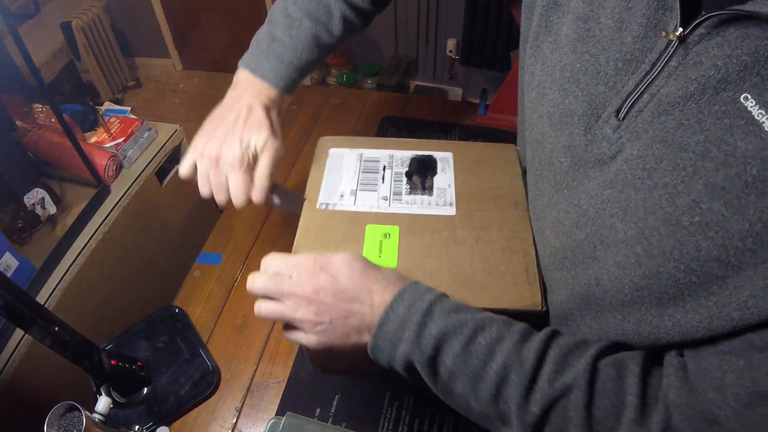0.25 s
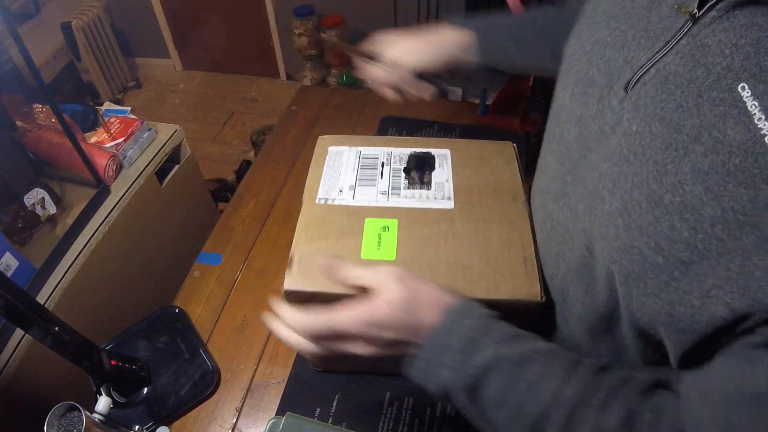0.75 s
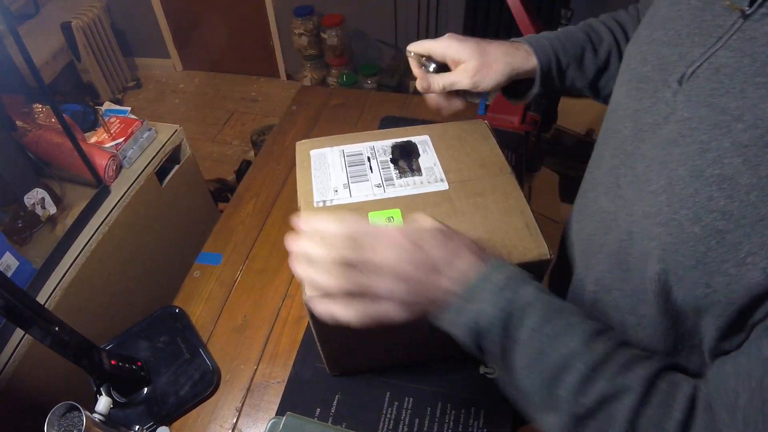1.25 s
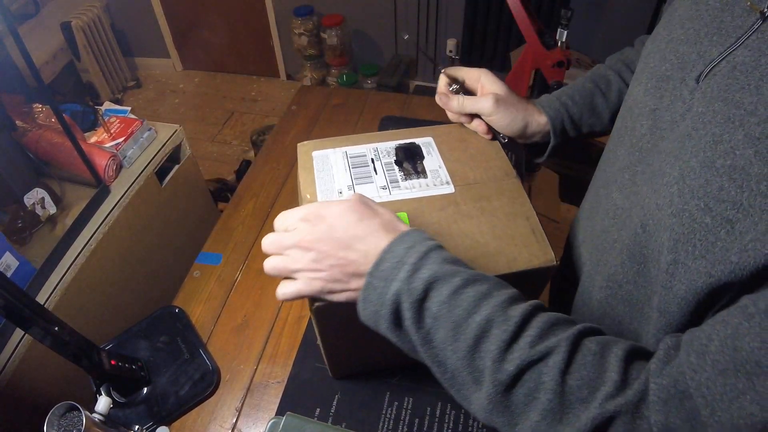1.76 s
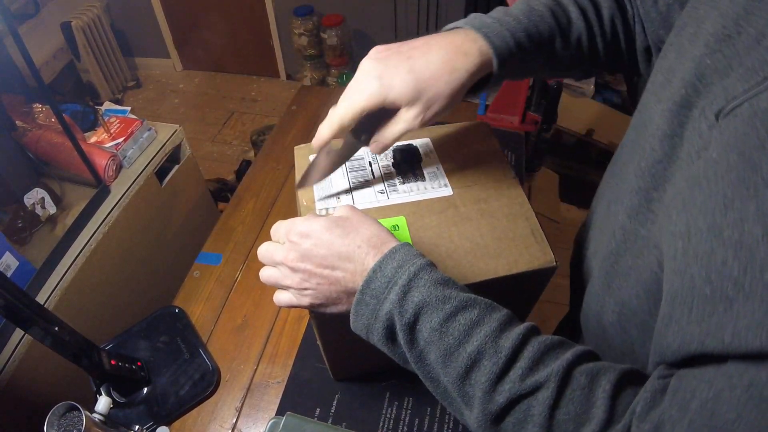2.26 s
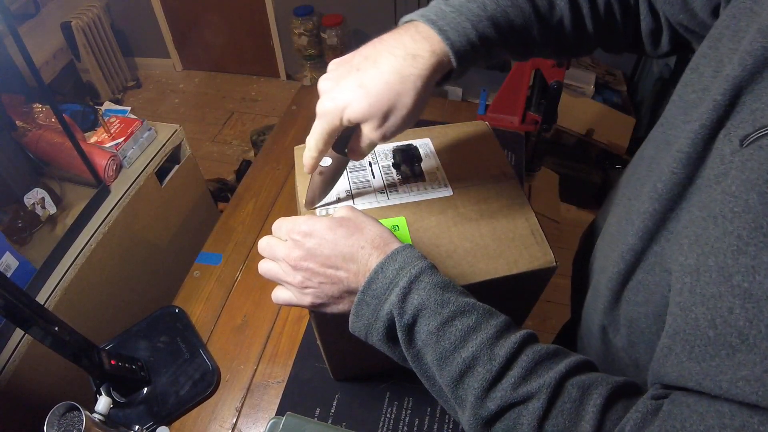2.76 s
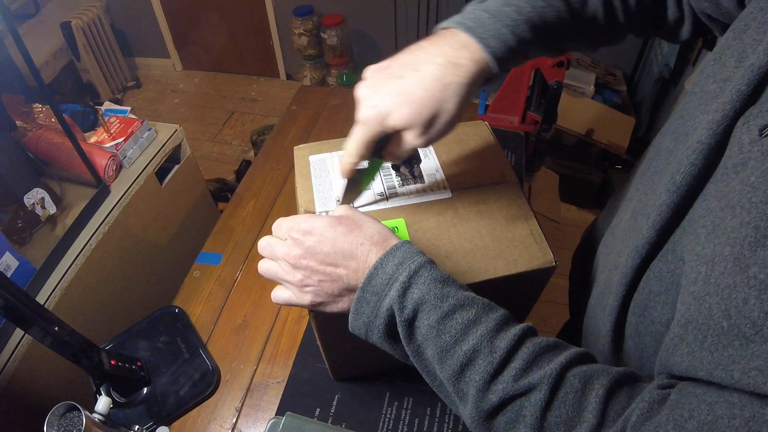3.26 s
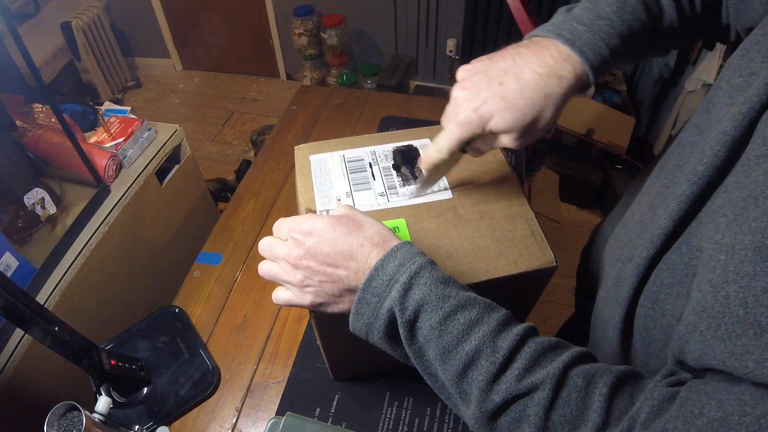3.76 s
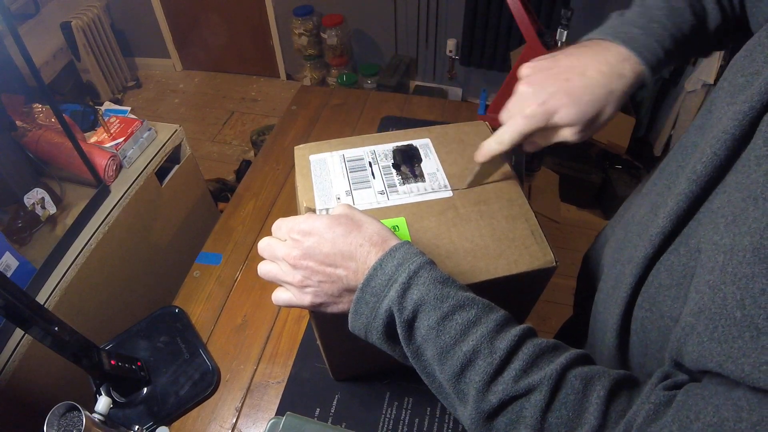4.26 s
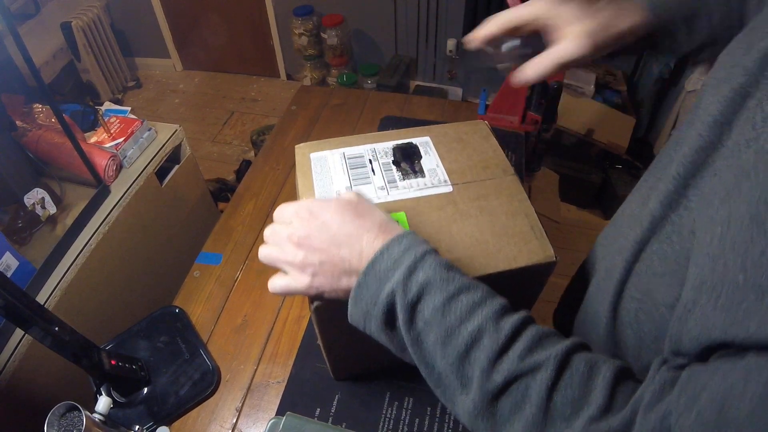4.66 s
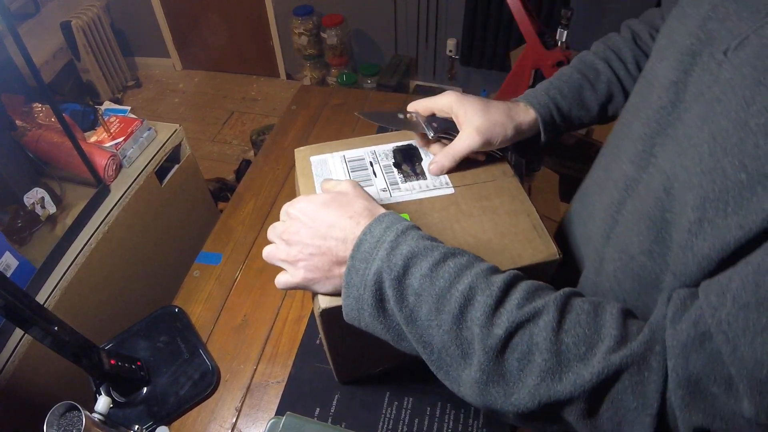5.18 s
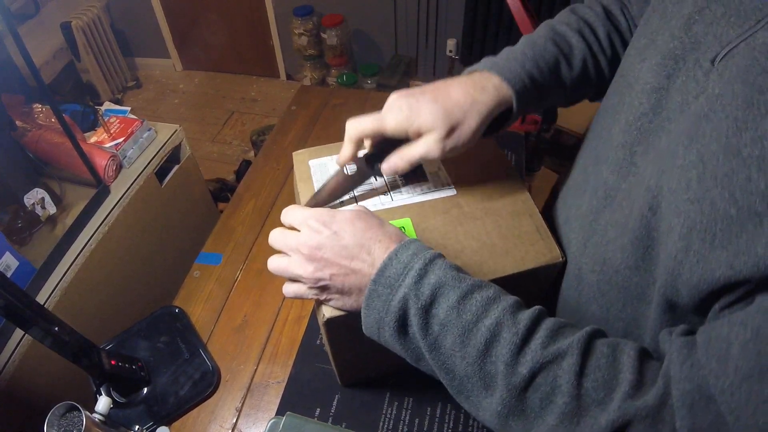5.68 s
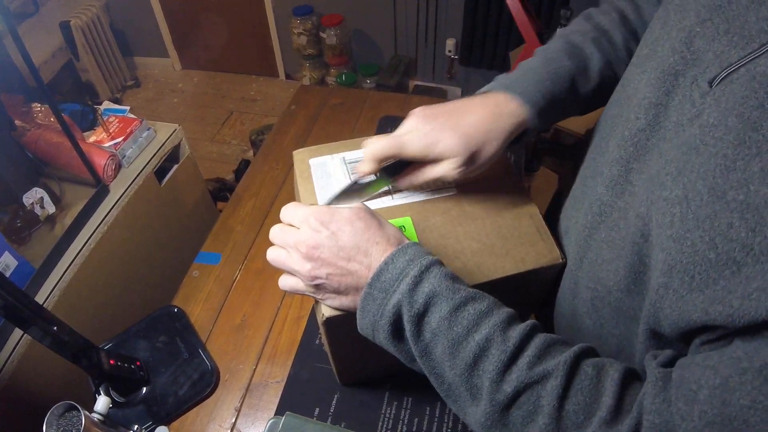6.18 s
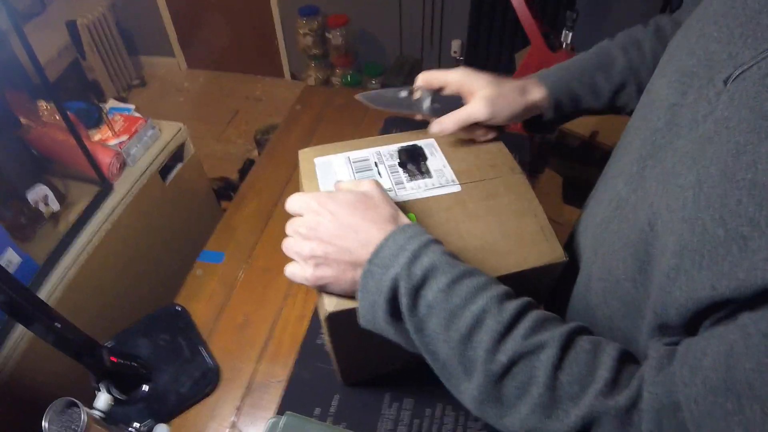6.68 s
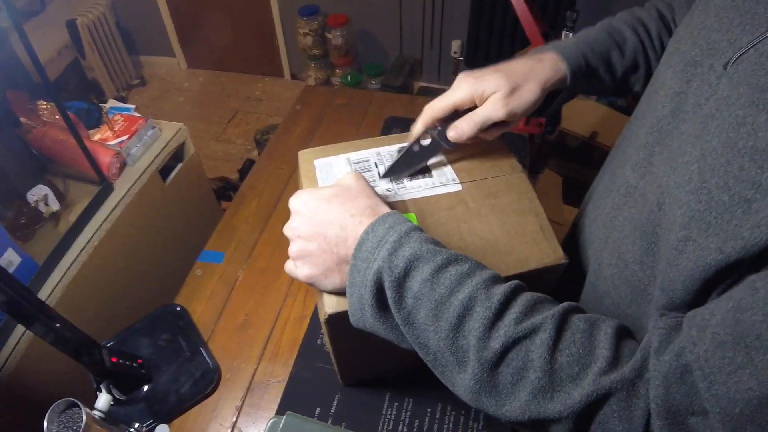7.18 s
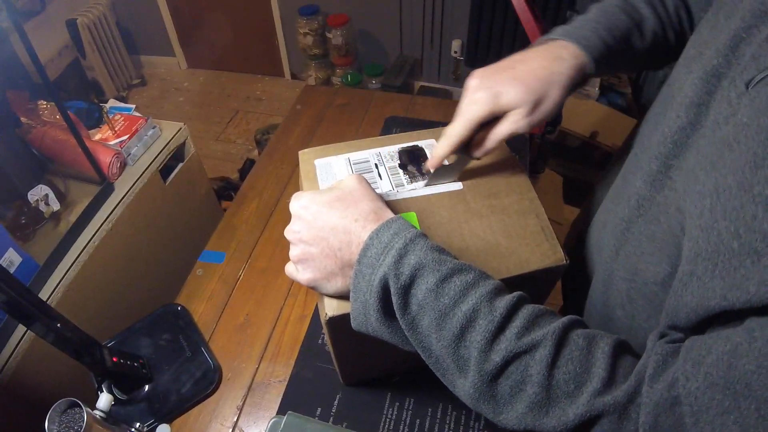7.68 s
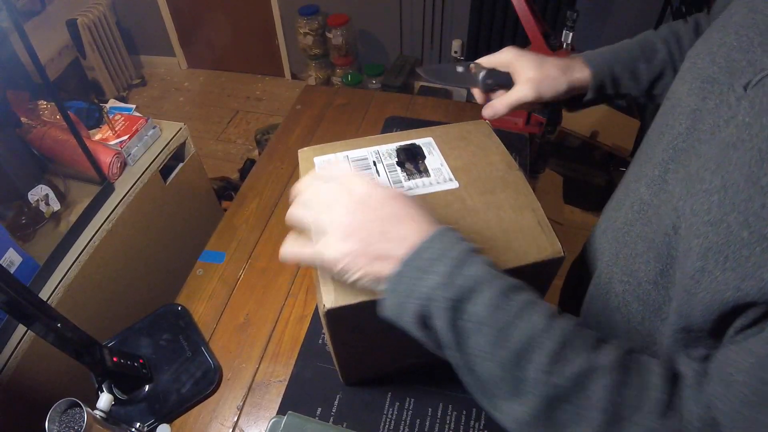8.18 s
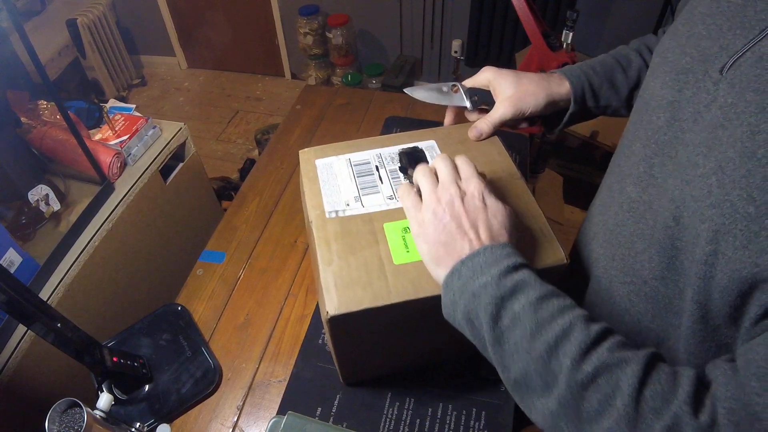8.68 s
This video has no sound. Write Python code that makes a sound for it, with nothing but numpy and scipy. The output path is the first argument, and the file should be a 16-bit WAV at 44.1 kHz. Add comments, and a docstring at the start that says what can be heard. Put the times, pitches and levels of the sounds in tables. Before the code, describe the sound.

Close up in a small workshop, a blade rasps through packing tape in two quick tugs, the hollow box droning underneath. Hands pat and shift the carton with dull bench knocks. A slower cut crackles and ends in a loud pop; the knife clicks in the hand, another cut follows, then hard bright knocks and one last ripping slice before soft rustling. Low rumble and thin hiss behind.

```python
"""A blade rasps and snaps through packing tape, close by in a small room, and the hollow cardboard box drones under it.
Friction is made of random slips and noise, breaks are short bursts, and resonances give them tape, board and steel.
A folding knife clicks in the hand, sleeves rustle, a palm pats the lid and a fingertip squeaks.
The box rocks on a wooden workbench: its knocks are smooth pushes that arrive dry, through the wood.
Behind it all lie a low rumble and a thin hiss; once the level sinks abruptly, then creeps back."""
import sys
import numpy as np
from scipy import signal
from scipy.fft import rfft, irfft
from scipy.io import wavfile
from scipy.ndimage import uniform_filter1d

SR = 44100
rng = np.random.default_rng(int(sys.argv[2]) if len(sys.argv) > 2 else 0)


def inscribe(sig):
    """Save sig as 16-bit PCM at rate SR to the path in sys.argv[1].

    A 1-D sig is mono; a 2-D sig holds one channel per row.
    Samples are clipped to [-1, 1] before scaling.
    """
    pcm = np.round(np.clip(np.atleast_2d(sig).T, -1, 1) * 32767)
    wavfile.write(sys.argv[1], SR, pcm.astype(np.int16))


N = 393813
TIME = np.arange(N) / SR

# colour of rasping and cracking tape: pitch_hz, level_db
TAPE_COLOUR = [(350, -6.5), (600, -6), (761, -15.5), (903, -4), (1210, -13.5), (1650, -7), (2100, -12.5),
               (2800, -8), (3900, -13), (5150, -2.5), (5900, -8), (6610, -6.5), (9430, -13.5), (10500, -28),
               (12400, -39.5), (14000, -57.5)]
# resonances of the hollow box: pitch_hz, width_hz, level_db
BOX_RESONANCES = [(190, 45, 3), (243, 30, -1), (330, 30, 3), (390, 85, 6), (498, 84, 5), (576, 57, -1),
                  (1126, 140, -1), (1390, 330, 1), (1730, 88, -8.5)]
PANEL_WIDTH_HZ = 65  # resonance of the panel under the blade


def blade():
    """The edge glides or sticks and slips: film rasps, steel sings, fibres crunch, and coarser tugs drive the box."""
    # pulls of the blade, levels before the trims below:
    # raggedness (0 to 1), ring_db, crunch_db, curve of (time_s, rasp_db, drone_db)
    strokes = [ (0.66, -17, -8, [(0.0, -38, -64), (0.035, -46.5, -58), (0.07, -47.5, -43.5),
               (0.122, -44, -51), (0.146, -27.5, -64), (0.158, -43, -51.5), (0.225, -37, -37.5),
               (0.265, -49.5, -48), (0.3, -52, -58)]), (0.81, -9, -4.5, [(0.3, -50, -53.5),
               (0.37, -40, -42), (0.405, -40, -40), (0.434, -26.5, -44), (0.448, -43, -36),
               (0.47, -36, -51), (0.5, -34, -58), (0.53, -55, -71), (0.55, -56, -66)]),
               (0.77, -15, -8, [(3.23, -63, -38), (3.266, -75, -62), (3.29, -59, -54), (3.398, -54.5, -41),
               (3.432, -63, -45.5), (3.63, -59, -43.5), (3.742, -54, -45.5), (3.81, -65, -49.5),
               (3.842, -36, -26.5)]), (.9, -11, -5, [(3.85, -40, -15.5), (3.856, -43.5, -28),
               (3.876, -36, -34), (3.906, -69, -40.5), (3.955, -74, -67)]), (.4, -5, -4.5, [(4.0, -58, -61),
               (4.04, -53.5, -53), (4.1, -56, -61), (4.16, -60.5, -57), (4.215, -58, -54),
               (4.236, -58, -35), (4.255, -56, -61)]), (.1, -30, -10.5, [(4.262, -51, -53),
               (4.285, -43.5, -33), (4.318, -55, -46), (4.38, -45.5, -49), (4.465, -46, -54),
               (4.5, -45, -40), (4.525, -53, -35), (4.56, -68, -67)]), (0.36, -3.5, -17, [(5.72, -71, -67),
               (5.765, -46, -42), (5.806, -58, -52), (5.86, -77, -76)]), (.5, 2, -10, [(5.872, -73, -60),
               (5.886, -42.5, -38), (5.905, -52, -46), (5.935, -61, -48), (5.99, -65.5, -58)]),
               (0.48, -11, -11, [(5.992, -60, -47.5), (6.004, -43.5, -54.5), (6.055, -49.5, -51),
               (6.1, -62, -60)]), (0.54, -5, -9.5, [(6.11, -66, -49), (6.136, -46.5, -52),
               (6.19, -47.5, -34.5), (6.22, -55, -53), (6.265, -42, -38.5), (6.308, -38.5, -45),
               (6.334, -55, -53), (6.348, -43.5, -52), (6.362, -49.5, -42)]),
               (0.91, -4, -5, [(7.42, -78, -58), (7.447, -66, -61), (7.475, -59, -57), (7.495, -49, -64),
               (7.533, -65, -68)]), (.8, -3, -2.5, [(7.535, -61, -63), (7.565, -56, -42), (7.604, -39, -42),
               (7.63, -44, -47), (7.642, -35, -55), (7.662, -58, -46), (7.7, -65, -55), (7.76, -66, -51)]),
               ]
    # singing of the scraped steel: pitch_hz, width_hz, level_db
    steel_modes = [(1625, 67, 5.5), (1770, 72, 5), (2120, 150, -9), (2980, 170, -3.5), (4930, 260, -1.5)]
    rasp_trim_db, drone_trim_db, panel_db = -4, -2.5, -1

    slips = friction(per_s=1800, spread_db=2.7, smooth=.5, clump_db=2.7, clump_per_s=260)
    tugs = friction(per_s=200, spread_db=2.2, smooth=.35, clump_db=2.4, clump_per_s=70)
    glide = rng.standard_normal(N)
    film, steel, paper, load = np.zeros((4, N))
    for ragged, ring_db, crunch_db, curve in strokes:
        tape = gain_curve(curve, column=1)
        push = gain_curve(curve, column=2)
        scrape = tape * (np.sqrt(ragged) * slips + np.sqrt(1 - ragged) * glide)
        film += scrape
        steel += from_db(ring_db) * scrape
        paper += from_db(crunch_db) * np.sqrt(tape * push)
        load += push

    # steady gliding sets the reference level of each filter
    rasp = shifting(colour(film, TAPE_COLOUR)) / np.std(colour(glide, TAPE_COLOUR))
    ring = resonate(steel, steel_modes) / np.std(resonate(glide, steel_modes))
    drone = rms_one(rms_one(box(tugs)) + from_db(panel_db) * panel(tugs))
    crunch = paper * fibres()
    hollow = from_db(drone_trim_db) * load * drone
    return from_db(rasp_trim_db) * (rasp + ring) + flutes() * (crunch + hollow)


def shifting(x):
    """The colour of the rasp shifts: each half octave swells and fades by itself."""
    shift_db, shifts_per_s = 2.6, 28
    out, below = 0, 0
    for hz in np.geomspace(700, 8000, 8):
        low = signal.sosfiltfilt(signal.butter(3, hz, fs=SR, output="sos"), x)
        band = low - below
        out = out + band * from_db(shift_db * wander(shifts_per_s))
        below = low
    return out + x - below


def fibres():
    """Paper fibres under the tape break in a dense crunch, each with a short ring at one of 14 pitches."""
    out = 0
    for hz in np.geomspace(980, 3800, 14):
        sizes = from_db(3.2 * np.minimum(rng.exponential(1, N), 3))
        breaks = (rng.random(N) < 60 / SR) * sizes
        out = out + resonate(breaks, [(hz, hz / 13, -3.5 * np.log2(hz / 900))])
    return rms_one(signal.sosfilt(signal.butter(2, 5000, fs=SR, output="sos"), out))


def flutes():
    """Gain that swings gently as the edge bumps over the flutes of the corrugated board."""
    flutes_per_s, jitter_cycles, swing_db = 23, 0.35, -0.5
    cycles = flutes_per_s * TIME + jitter_cycles * wander(19)
    return from_db(swing_db * np.cos(2 * np.pi * cycles))


def panel(x):
    """One resonance of the panel under the blade, gliding with the place of the cut."""
    size, r = 256, np.exp(-np.pi * PANEL_WIDTH_HZ / SR)
    out, state = np.zeros(N), np.zeros(2)
    for i, hz in zip(range(0, N, size), panel_hz(TIME[::size])):
        poles = [1, -2 * r * np.cos(2 * np.pi * hz / SR), r * r]
        out[i:i + size], state = signal.lfilter([1, 0, -1], poles, x[i:i + size], zi=state)
    return rms_one(board(out))


def panel_hz(s):
    """Pitch of the panel at time s; it rings higher as the cut nears a stiff edge."""
    # glide of the panel: time_s, pitch_hz
    glide_points = [(0, 302), (.3, 360), (.43, 590), (.55, 450), (3.3, 350), (3.5, 390), (3.63, 550),
                    (3.73, 577), (3.85, 534), (4.3, 530), (4.55, 564), (5.75, 304), (6.1, 322), (6.3, 534),
                    (6.4, 510), (7.48, 606), (7.63, 623), (7.75, 487), (8.0, 563)]
    return np.interp(s, *np.transpose(glide_points))


def box(x):
    """The hollow box: panel modes in soft board."""
    return board(resonate(x, BOX_RESONANCES))


def board(x):
    """Soft board lets little through above its main resonances."""
    edge_hz, leak_db = 650, -19
    return signal.sosfilt(signal.butter(6, edge_hz, fs=SR, output="sos"), x) + from_db(leak_db) * x


def tape_snaps():
    """Stretched tape cracks and the released panel thumps: (towards the microphone, into the room)."""
    # snaps under the blade: time_s, crack_db, thump_db
    snap_times = [(0.1434, -34, -47), (0.203, -38, -27.5), (0.219, -25, -40), (0.413, -43, -46),
                  (0.434, -28, -20), (0.456, -25, -44), (1.67, -29, -32), (2.973, -21, -27.5),
                  (3.2009, -25.5, -29), (3.299, -38.5, -31), (3.382, -35, -51), (3.488, -39.5, -27.5),
                  (3.618, -33, -30), (3.629, -46, -26), (3.7234, -38.5, -21.5), (3.8440, -23, -8),
                  (3.865, -34, -16), (3.875, -38, -16), (4.269, -35.5, -25), (5.887, -45, -52),
                  (6.309, -31, -17), (6.343, -42, -28), (6.3717, -26, -10.5), (6.379, -28.5, -29),
                  (7.480, -27, -32), (7.6256, -27, -18.5), (7.641, -19, -40), (7.988, -34.5, -26.5),
                  (8.0496, -31, -36)]
    crack_room_db, thump_room_db, thump_panel_db = 3, -4, 5
    cracks, spread, thumps = np.zeros((3, N))
    for s, crack_db, thump_db in snap_times:
        crack = burst(lambda x: colour(x, TAPE_COLOUR), decay_s=.005, flurry=3.0)
        add(cracks, s, from_db(crack_db) * crack)
        add(spread, s, from_db(crack_db + crack_room_db) * clean_crack(TAPE_COLOUR))
        struck = BOX_RESONANCES + [(panel_hz(s), PANEL_WIDTH_HZ, thump_panel_db)]
        thump = burst(lambda x: board(resonate(x, struck)), decay_s=0.0066, flurry=0.98)
        add(thumps, s, from_db(thump_db) * thump)
    dull = [(100, -1.0), (5500, -5.0), (9000, -10.5), (13000, -17)]  # Hz, dB
    return colour(cracks + thumps, dull), colour(spread + from_db(thump_room_db) * thumps, dull)


def paper_tears():
    """A bundle of fibres parts in a quick run of dry ticks around one pitch, and jolts the box."""
    # tears under the tape: time_s, level_db (of the first tick), pitch_hz
    tear_times = [(0.008, -42.5, 2270), (0.131, -38, 3300), (0.167, -33, 2200), (0.18, -44.5, 3040),
                  (0.221, -48, 2700), (0.237, -50, 2000), (0.413, -32, 3300), (0.431, -30.5, 2400),
                  (0.434, -30, 840), (0.436, -30, 3920), (0.457, -37, 2350), (0.483, -42, 2240),
                  (0.494, -32, 2070), (3.347, -46, 2660), (3.381, -41.5, 3220), (3.419, -43.5, 1500),
                  (3.455, -40, 1400), (3.5, -44.5, 1600), (3.538, -41, 1210), (3.585, -46, 1210),
                  (3.627, -39, 810), (3.76, -45.5, 1300), (4.497, -41, 4700), (6.269, -37, 1600),
                  (6.286, -33.5, 1200), (6.304, -36.5, 2380), (7.424, -44.5, 730), (7.443, -43.5, 2260),
                  (7.458, -51, 2000), (7.603, -30.5, 2000), (7.624, -22, 810), (7.64, -25.5, 1500),
                  (7.695, -45, 1430)]
    run_s, fade_db, spread_octaves, jolt_db = .013, -7, .22, -7
    out = np.zeros(N)
    for s, level_db, centre_hz in tear_times:
        for late in rng.random(size=4) * [0, 1, 1, 1]:
            hz = centre_hz * 2 ** (spread_octaves * rng.standard_normal())
            fibre = [(hz, hz / 6, -7)]
            snap = burst(lambda x: resonate(x, fibre) + from_db(jolt_db) * box(x), decay_s=0.0014, flurry=0.84)
            add(out, s + late * run_s, from_db(level_db + fade_db * late) * snap)
    return out


def knocks():
    """Each contact is one smooth push into bench and microphone stand; the shorter it is, the brighter."""
    # resonances of the bench: pitch_hz, width_hz, level_db
    bench_modes = [(70, 50, -5), (132, 55, -2), (245, 50, -5.5), (320, 50, -4), (540, 190, -4.5),
                   (860, 300, -2), (1400, 600, -5)]
    # ring of the microphone stand: pitch_hz, width_hz, level_db
    stand_modes = [(6620, 230, 3.5), (8720, 170, 8)]
    lead_s, rebound_s, rebound_db = 1 / 200, .035, -25
    out = np.zeros(N)
    t = TIME[:SR // 8] - lead_s
    for s, level_db, contact_ms in contacts():
        half_width = contact_ms / 1000 / 2
        push = 1 / np.cosh(np.minimum(1.333 * t / half_width, 40))
        # the crushed edge meets the wood unevenly and touches again at once
        again_s, again_db = rng.uniform(.0007, .003), rng.uniform(-17, -8)
        push += from_db(again_db) / np.cosh(np.clip((t - again_s) / half_width, -40, 40))
        # the box settles in a few weaker, softer rebounds
        for late in rng.random(size=3):
            lag = np.clip((t - .004 - late * rebound_s) / half_width, -80, 80)
            push += from_db(rebound_db - 22 * late) / np.cosh(0.45 * lag)
        # each spot on the bench answers with its own mix of modes
        spot = varied(bench_modes, detune=.11, spread_db=3)
        stand = from_db(8.0) * resonate(push, stand_modes)
        knock = from_db(-11.0) * push + resonate(push, spot) + stand
        add(out, s - lead_s, from_db(level_db) * knock)
    return signal.sosfilt(signal.butter(2, 55, "high", fs=SR, output="sos"), out)


def contacts():
    """Every knock; the hardest landings slap a second corner down just after."""
    # box on bench: time_s, level_db (of the push, before its resonances), contact_ms (width at half height)
    knock_times = [(0.5667, -18, 0.93), (0.7657, -32.5, 1.9), (1.0421, -15, 0.74), (1.1839, -28, 0.39),
                   (1.1956, -10, 0.5), (1.2024, -24.5, 0.18), (1.2223, -24.5, 0.38), (1.274, -23, 1.07),
                   (3.395, -23, 1.3), (3.456, -24.5, 1.3), (3.971, -20, 0.8), (4.066, -27, 2.1),
                   (4.537, -20, 2.4), (4.5897, -16.5, 0.89), (4.681, -16.5, 0.77), (4.7311, -17.5, 0.84),
                   (4.905, -19, 1.13), (5.3653, -24.5, 1.4), (5.441, -33, 2.3), (5.5351, -26, 1.02),
                   (5.606, -22, 1.36), (5.7164, -18.5, 1.6), (5.805, -22.5, 1.23), (5.9867, -16, 0.69),
                   (6.0788, -19, 0.96), (6.3107, -36, 0.58), (6.356, -21, 0.56), (6.3726, -19, 0.48),
                   (6.41, -24, 0.81), (6.4993, -20.5, 0.25), (6.5127, -14.5, 0.23), (6.5151, -10.5, 0.86),
                   (6.578, -29.5, 0.38), (6.5935, 2, 0.13), (6.599, -13, 0.11), (6.606, -27.5, 0.23),
                   (6.622, -24, 0.53), (6.633, -30, 0.42), (6.674, -30.5, 0.4), (6.7212, -1, 0.14),
                   (6.763, -30, 0.47), (6.7711, -25.5, 0.19), (6.8142, -10, 0.19), (6.829, -34, 0.37),
                   (6.8392, -33, 0.5), (6.9232, -19, 0.33), (6.9398, -30.5, 0.37), (6.952, -30.5, 0.9),
                   (7.013, -13.5, 0.25), (7.0344, -22, 0.31), (7.05, -35, 1.3), (7.117, -25.5, 0.49),
                   (7.143, -29, 0.97), (7.164, -37.5, 0.81), (7.209, -15.5, 0.32), (7.243, -39, 0.69),
                   (7.286, -9, 0.23), (7.298, -26.5, 0.2), (7.302, -24, 0.35), (7.311, -25, 0.76),
                   (7.7741, -15.5, 0.4), (8.637, -38.5, 0.49), (8.7177, -31, 0.56), (8.808, -34, 0.68)]
    slap_above_db, slap_lag_s, slap_db = -6, 0.00207, -19
    for s, level_db, contact_ms in knock_times:
        yield s, level_db, contact_ms
        if level_db > slap_above_db:
            yield s + slap_lag_s, level_db + slap_db, contact_ms


def bench_rattle(knock):
    """Things lying on the bench shiver dully for a moment after each knock; they have only so much play."""
    rattle_db, limit_db = -5.5, -37.5
    t = TIME[:SR // 5]
    shiver = rng.standard_normal(len(t)) * np.exp(-t / 0.015) * (t > .005)
    dull = [(60, -10), (200, 0), (380, 2), (600, -5), (1100, -10), (2000, -22), (3500, -34)]  # Hz, dB
    shiver = colour(shiver / np.sqrt(np.sum(shiver ** 2)), dull)
    play = from_db(limit_db)
    return from_db(rattle_db) * signal.fftconvolve(play * np.tanh(knock / play), shiver)[:N]


def knife_clicks():
    """Steel parts meet and the hand damps their ring at once: (towards the microphone, into the room)."""
    # clicks: time_s, level_db
    click_times = [(4.554, -46), (4.851, -48), (4.928, -49), (4.958, -47), (4.984, -34), (5.0817, -20),
                   (5.094, -34.5), (5.2319, -41), (5.2354, -20), (5.2368, -19), (5.251, -25.5),
                   (5.698, -28.5), (6.835, -51), (7, -49.5), (7.18, -55), (8.085, -45), (8.328, -50)]
    # resonances of the knife: pitch_hz, width_hz, level_db
    knife_modes = [(366, 24, 0), (468, 45, 4), (910, 190, -1.5), (1780, 480, 5.5), (2250, 640, -11),
                   (2800, 330, -3.5), (4890, 990, 4), (6670, 420, -9), (7960, 900, -15),
                   (11200, 4000, -16.5)]
    # a click as it spreads to all sides of the room: pitch_hz, level_db
    spread_colour = [(120, -29), (350, 4), (1000, 2.5), (1900, 0), (3900, -4.5), (5200, 2.5), (6700, 3),
                     (9400, -11.5), (10500, -25), (14000, -41)]
    # the microphone dulls the very top of the clicks: pitch_hz, level_db
    microphone_colour = [(100, 13.5), (9000, -1), (10500, -10), (14000, -17)]
    room_db = 2.5
    direct, spread = np.zeros((2, N))
    for s, level_db in click_times:
        spot = varied(knife_modes, detune=.015, spread_db=1.2)
        click = burst(lambda x: resonate(x, spot), decay_s=0.0033, flurry=2.5)
        add(direct, s, from_db(level_db) * click)
        add(spread, s, from_db(level_db + room_db) * clean_crack(spread_colour))
    return colour(direct, microphone_colour), spread


def sleeves():
    """Fleece and skin brush over cardboard: fine, soft friction, and a drone where they press on the box."""
    # slides of a sleeve or hand: start_s (at full level), hold_s, rustle_db, drone_db
    slides = [(0.632, 0.15, -61.5, -72), (0.963, 0.035, -49.5, -52), (1.079, 0.19, -54, -76),
              (1.463, 0.007, -52, -52.5), (1.625, 0.38, -57.5, -61.5), (2.112, 0.3, -70, -76),
              (3.146, 0.085, -58, -59.5), (4.692, 0.19, -64.5, -61), (4.846, 0.19, -60, -64),
              (5.313, 0.11, -52.5, -59.5), (6.425, 0.067, -52.5, -52), (7.457, 0.044, -70, -61),
              (7.829, 0.28, -62, -59), (8.202, 0.025, -52, -51), (8.487, 0.16, -65.5, -61),
              (8.737, 0.25, -51, -85), (8.75, 0.0036, -56, -68)]
    # colour of the rustle: pitch_hz, level_db
    cloth_colour = [(240, -19), (400, -2), (625, -10), (880, -8), (1770, -6), (2090, -8.5), (4130, -10.5),
                    (5090, -2), (6090, -5.5), (6560, -5), (9230, -11), (10200, -26), (12100, -25),
                    (14000, -50.5)]
    attack_s, release_s = 0.021, 0.0093
    slips = friction(per_s=4800, spread_db=3.5, smooth=0.99, clump_db=2.5, clump_per_s=61)
    cloth = rms_one(colour(slips, cloth_colour))
    drone = rms_one(box(slips))
    out = np.zeros(N)
    for start, hold, rustle_db, drone_db in slides:
        rubbing = from_db(rustle_db) * cloth + from_db(drone_db) * drone
        out += gesture(start, hold, attack_s, release_s) * rubbing
    return out


def gesture(start, hold, attack_s, release_s):
    """Envelope that rises to 1 at start, holds and dies away."""
    rise = np.minimum(TIME - start, 0) / attack_s
    fall = np.maximum(TIME - start - hold, 0) / release_s
    return np.exp(rise - fall)


def pats():
    """A soft palm lands on the box and excites only the lowest modes of the lid."""
    # landings: time_s, level_db
    pat_times = [(0.572, -33.5), (1.048, -28), (1.182, -28), (1.225, -27.5), (1.251, -41), (1.353, -28.5),
                 (4.737, -35), (6.519, -20), (7.826, -36), (8.143, -40), (8.629, -48), (8.682, -40)]
    # boom of the lid: pitch_hz, width_hz, level_db
    lid_modes = [(204, 27, 12), (287, 20, -8.5), (332, 31, -29.5)]
    out = np.zeros(N)
    soft = signal.butter(2, 400, fs=SR, output="sos")
    for s, level_db in pat_times:
        boom = burst(lambda x: signal.sosfilt(soft, resonate(x, lid_modes)), decay_s=0.008, flurry=0.15)
        add(out, s, from_db(level_db) * boom)
    return out


def squeaks():
    """The skin of a fingertip sticks and slips on the box fast enough to give a brief, unsteady tone."""
    # squeaks: time_s (of the peak), pitch_hz, length_s, peak_db
    squeak_times = [(0.963, 1897, 0.012, -43.5)]
    out = np.zeros(N)
    for s, hz, length, peak_db in squeak_times:
        swell = np.exp(-(2 * (TIME - s) / length) ** 2)
        out += from_db(peak_db) * swell * np.sin(2 * np.pi * hz * TIME + 0.75 * wander(300))
    return out


def tick():
    """One small dry tick just before the level drops: a step that decays exponentially."""
    at_s, peak_db, decay_s = 6.5435, -30, .003
    since = TIME - at_s
    return from_db(peak_db) * (since > 0) * np.exp(-np.abs(since) / decay_s)


def bench_tremble():
    """The shifting weight of leaning hands shakes the bench in small dull jolts."""
    # strength of the leaning, before the trim: time_s, level_db
    leaning = [(0.0, -58), (0.35, -49.5), (0.82, -58.5), (1.22, -45.5), (1.49, -55), (1.99, -53),
               (2.46, -67.5), (2.91, -58.5), (3.85, -51), (4.12, -50.5), (4.43, -54.5), (4.75, -48.5),
               (5.42, -56.5), (6.1, -48.5), (6.47, -43), (6.82, -56.5), (7.56, -54), (8.38, -64.5),
               (8.68, -49.5), (8.93, -61.5)]
    # colour of the jolts: pitch_hz, level_db
    tremble_colour = [(15, -6), (30, 8), (70, 5), (130, 1.5), (200, -2), (330, -10.5), (550, -25),
                      (1200, -40.5), (3000, -53.5)]
    trim_db = 4.0
    jolts = friction(per_s=130, spread_db=2.5, smooth=0.71, clump_db=3.5, clump_per_s=26)
    return from_db(trim_db) * gain_curve(leaning) * rms_one(colour(jolts, tremble_colour))


def background():
    """Low room rumble and a thin hiss, both coloured noise."""
    # colour of the rumble: pitch_hz, level_db
    rumble_colour = [(12, -15), (27, 3.5), (55, -5), (90, -18), (200, -32.5), (500, -39.5), (1500, -61.5)]
    # colour of the hiss: pitch_hz, level_db
    hiss_colour = [(200, -0.5), (500, 1), (1000, -1), (2000, -2.5), (4200, -11), (5200, -3.5), (6050, -11),
                   (6550, 6), (7100, -5), (9600, -8.5), (10400, -15.5), (13000, -13.5), (14500, -41)]
    # loudness of the hiss: time_s, level_db
    hiss_curve = [(0, -62), (2.8, -63), (6.5, -61.5), (7.5, -67.5), (8.3, -65.5), (8.93, -61)]
    rumble_db = -52.5
    rumble = from_db(rumble_db) * rms_one(colour(rng.standard_normal(N), rumble_colour))
    return rumble + gain_curve(hiss_curve) * rms_one(colour(rng.standard_normal(N), hiss_colour))


def room(x):
    """Uneven noise tail of the small, cluttered workshop; its bass lingers a little longer than its treble."""
    bass_t60_s, treble_t60_s, room_db = 0.34, 0.3, -6.5
    t = TIME[:SR // 2]
    tail = 0
    for kind, t60 in (("low", bass_t60_s), ("high", treble_t60_s)):
        split = signal.butter(2, 3000, kind, fs=SR, output="sos")
        noise = signal.sosfilt(split, rng.standard_normal(len(t)))
        tail = tail + noise * from_db(-60 * t / t60) * (t > .003)
    tail = tail * from_db(1.3 * wander(400)[:len(t)])
    walls = [(150, -6.0), (600, -2.0), (2000, 0.0), (6500, -3.0), (12000, 1.0)]  # Hz, dB
    tail = colour(tail / np.sqrt(np.sum(tail ** 2)), walls)
    return from_db(room_db) * signal.fftconvolve(x, tail)[:N]


def dip():
    """Gain of a sudden drop and its slow recovery."""
    at_s, depth_db, half_life_s = 6.548, -15, 0.41  # the drop in dB has halved after this time
    since = np.maximum(TIME - at_s, 0)
    onset = uniform_filter1d((since > 0) * 1., size=400)
    return from_db(depth_db * onset / (1 + since / half_life_s))


def friction(per_s, spread_db, smooth, clump_db, clump_per_s):
    """Tiny slips of uneven size that come in clumps, over a smooth rubbing noise."""
    sizes = from_db(spread_db * np.minimum(rng.exponential(1, N), 4))
    slips = (rng.random(N) < per_s / SR) * sizes * rng.choice([-1, 1], N)
    rubbing = rms_one(slips) + smooth * rng.standard_normal(N)
    return rms_one(rubbing * from_db(clump_db * wander(clump_per_s)))


def burst(body, decay_s, flurry):
    """A break: one sharp release and a dying flurry of slips through a body, scaled to even energy."""
    t = TIME[:SR // 8]
    slips = rng.standard_normal(len(t)) * np.exp(-t / decay_s)
    slips *= flurry / np.sqrt(np.sum(slips ** 2))
    slips[0] += 1
    sound = body(slips)
    # rms 0.5 if all its energy fell within 1/120 s
    return sound / (2 * np.sqrt(np.sum(sound ** 2) / (SR // 120)))


def clean_crack(spectrum):
    """A break summed over all directions: its ripples even out to one smooth colour."""
    return burst(lambda x: colour(x, spectrum), decay_s=1, flurry=0)


def varied(modes, detune, spread_db):
    """The same modes struck at another spot: a little detuned, in another mix."""
    return [(hz * (1 + detune * rng.standard_normal()), width, db + spread_db * rng.standard_normal())
            for hz, width, db in modes]


def resonate(x, modes):
    """Parallel two-pole resonances; a narrower one rings longer."""
    out = np.zeros(len(x))
    for hz, width, db in modes:
        r = np.exp(-np.pi * width / SR)
        poles = [1, -2 * r * np.cos(2 * np.pi * hz / SR), r * r]
        ring = signal.lfilter([1, 0, -1], poles, x + 1e-18)
        out += from_db(db) * (1 - r * r) / 2 * ring
    return out


def colour(x, spectrum):
    """Causal (minimum-phase) filter with the given spectrum."""
    size = 8192
    hz, db = np.transpose(spectrum)
    bins_hz = np.arange(size // 2 + 1) * SR / size
    log_gain = np.log(from_db(np.interp(np.log(bins_hz + 1), np.log(hz), db)))
    # folding the cepstrum onto positive times makes the phase minimal
    cepstrum = irfft(log_gain)[:size // 2]
    cepstrum[1:] *= 2
    return signal.fftconvolve(x, irfft(np.exp(rfft(cepstrum, size))))[:len(x)]


def gain_curve(rows, column=1):
    """One dB column of a curve as a gain, fading within milliseconds outside its span."""
    rows = np.array(rows)
    inside = (TIME >= rows[0, 0]) & (TIME <= rows[-1, 0])
    fade = np.abs(uniform_filter1d(inside * 1., size=400))
    return from_db(np.interp(TIME, rows[:, 0], rows[:, column])) * fade


def wander(per_s):
    """Smooth chance of rms 1 that changes about per_s times a second."""
    knots = rng.standard_normal(N // 8)
    return rms_one(np.interp(TIME * per_s, np.arange(len(knots)), knots))


def add(track, s, sound):
    """Mix a short sound in at time s."""
    start = int(round(s * SR))
    track[start:start + len(sound)] += sound[:N - start]


def rms_one(x):
    """Scale to unit rms."""
    return x / np.sqrt(np.mean(x ** 2) + 1e-20)


def from_db(db):
    """Decibels to gain."""
    return 10 ** (np.asarray(db) / 20)


def scene():
    """Airborne sounds excite the room, those carried by the bench stay dry; knocks, rattle and tick skip the dip."""
    snaps, snaps_spread = tape_snaps()
    clicks, clicks_spread = knife_clicks()
    rubbing = blade() + paper_tears() + sleeves() + squeaks() + pats()
    direct = rubbing + snaps + clicks
    reverb = room(rubbing + snaps_spread + clicks_spread)
    dipped = dip() * (direct + reverb + background() + bench_tremble())
    knock = knocks()
    return (dipped + knock + bench_rattle(knock) + tick())[None]


def record(dry):
    """The top is cut steeply above 14.3 kHz."""
    return signal.sosfilt(signal.ellip(10, .1, 80, 14300, fs=SR, output="sos"), dry)


dry = scene()
out = record(dry)
inscribe(out)
```